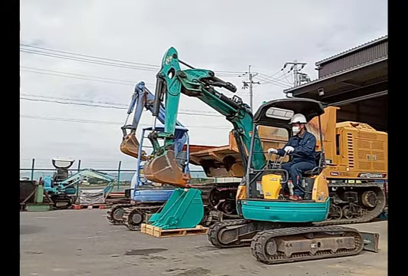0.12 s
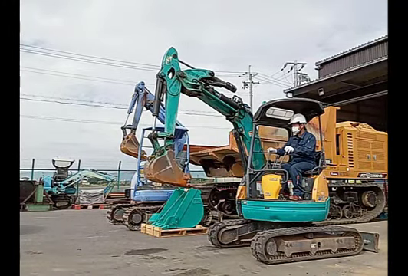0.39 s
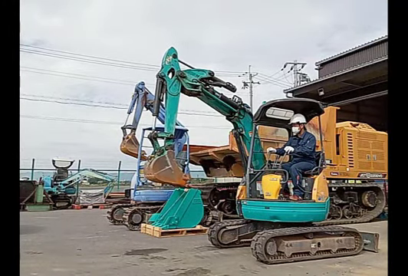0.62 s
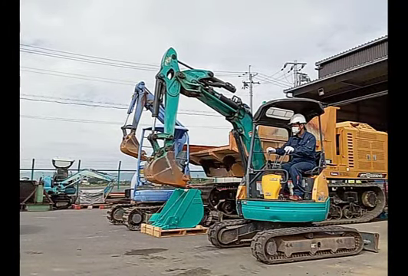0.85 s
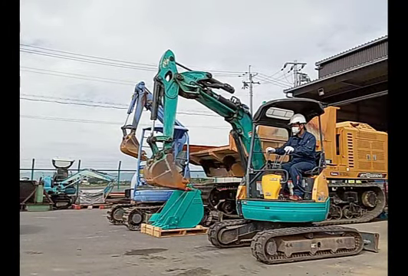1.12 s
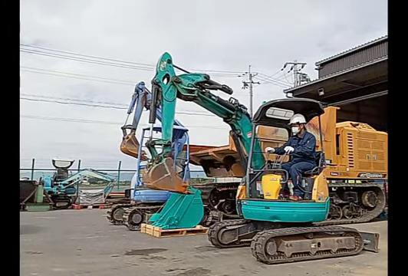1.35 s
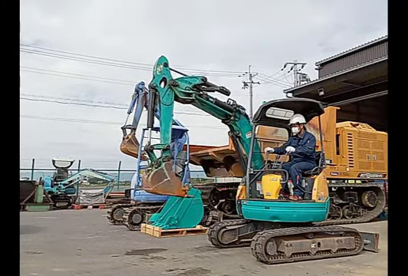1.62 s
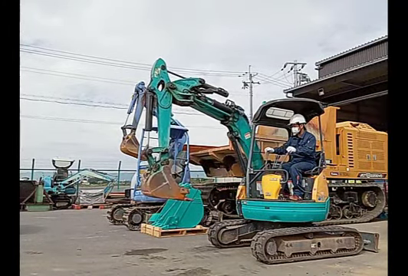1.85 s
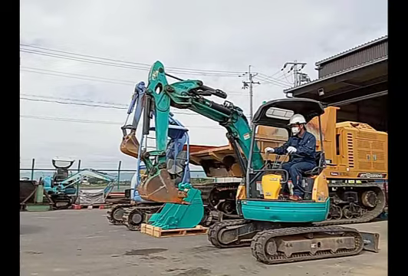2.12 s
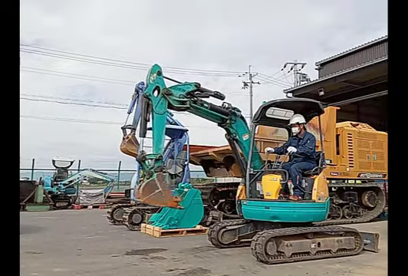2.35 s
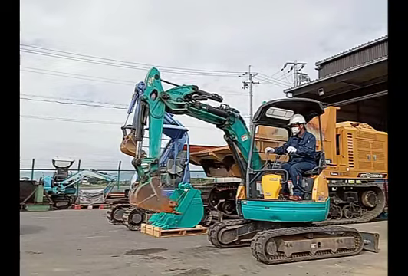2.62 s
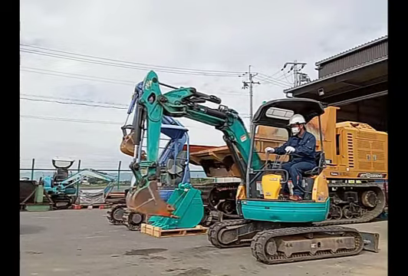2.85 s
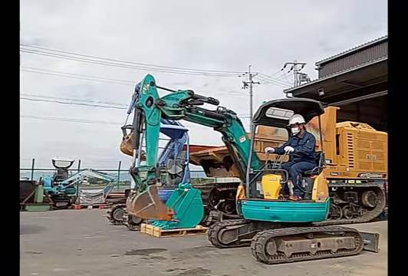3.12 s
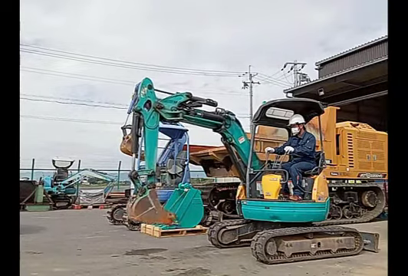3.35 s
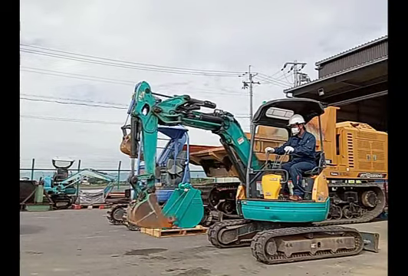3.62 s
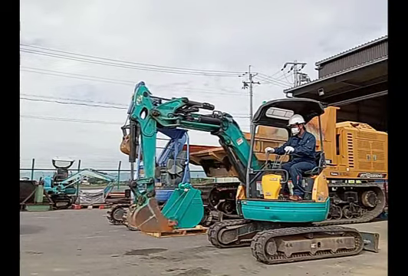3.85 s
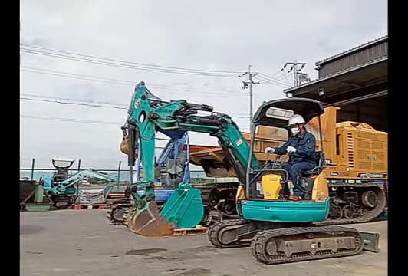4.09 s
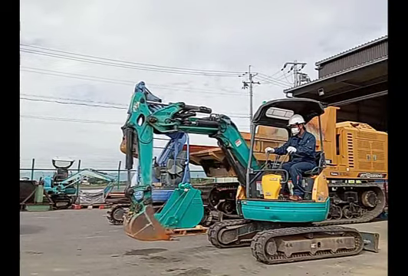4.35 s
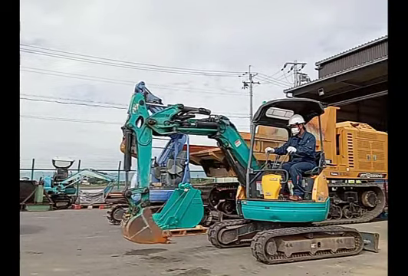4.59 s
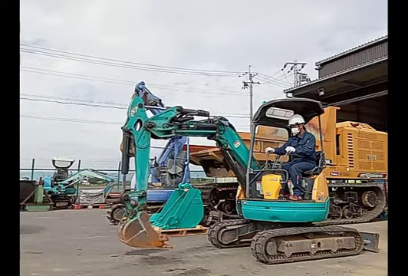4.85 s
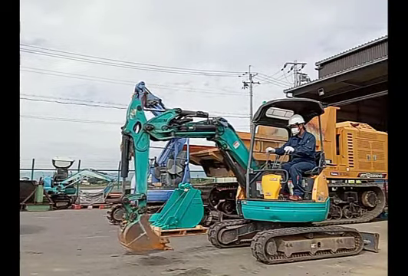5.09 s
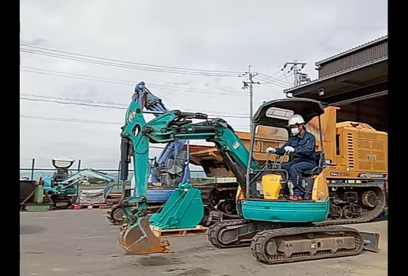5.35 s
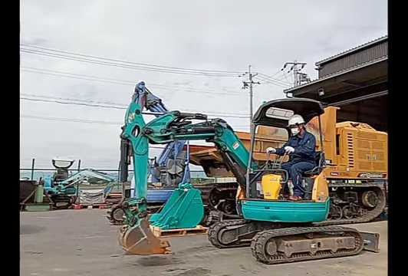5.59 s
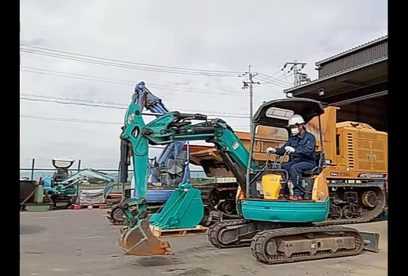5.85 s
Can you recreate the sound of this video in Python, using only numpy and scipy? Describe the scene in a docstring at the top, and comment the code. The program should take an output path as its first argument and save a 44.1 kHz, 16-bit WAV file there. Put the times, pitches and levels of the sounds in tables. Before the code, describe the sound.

A small diesel excavator runs close by from start to finish, already going at 0 s and still going when the sound cuts off near 6 s. Its speed is almost steady, about 1350 rpm, with slight hunting. The low exhaust hum sits around 135 Hz; a second engine further off hums near 127 Hz, so they beat in a quick throb, roughly eight pulses a second, and the camera's automatic gain pumps everything with it. Over this lie dry metallic knocks, grainy casing rattle and low fan and airflow rumble, with short diffuse yard echoes. At 0.34 s a steel pin gives one sharp, short double-edged click. From about 1.25 to 4.15 s hydraulic valves add a very faint, thin hiss around 10 kHz, softer outside that span. A much fainter tick comes at 4.8 s, and the near exhaust sinks slightly after 5.2 s. Stereo is moderately wide, with clatter more diffuse than bass.

```python
"""A yard: a small three-cylinder diesel excavator idles nearby and a second engine drones further off.
From the start their exhaust tones beat, and the camera's fast gain control pumps everything with that beat;
blows ring in the near engine over shaped noise, and the yard echoes. At 0.34 s a steel pin clicks.
From 1.25 to 4.15 s the hydraulics move the arm and high bands of noise hiss more strongly in the valves.
At 4.8 s the pin ticks faintly, and the near exhaust sinks at the end."""
import sys
import numpy as np
from scipy import signal
from scipy.fft import rfft, irfft, next_fast_len
from scipy.io import wavfile
from scipy.ndimage import uniform_filter1d, map_coordinates

SR = 44100
rng = np.random.default_rng(int(sys.argv[2]) if len(sys.argv) > 2 else 0)


def wav_out(sig):
    """Save sig, one row per channel (or a flat mono array), as 16-bit PCM at SR to the path in sys.argv[1]."""
    wavfile.write(sys.argv[1], SR, np.round(np.clip(np.atleast_2d(sig).T, -1, 1) * 32767).astype(np.int16))


def gain_from_db(level_db):
    """Convert decibel levels to linear amplitude factors (20 dB per decade)."""
    decades = np.asarray(level_db, float) / 20
    return 10 ** decades


N = 263277

# All levels are those ahead of the microphones and the gain control.
# near engine speed as the governor hunts: (time [s], speed [rpm])
ENGINE_SPEED = [(0, 1337.3), (.57, 1379.5), (.82, 1341.6), (1.35, 1367.2), (2.46, 1352.1), (3.22, 1364),
                (3.99, 1362.1), (4.62, 1352.3), (5.26, 1362.2), (5.76, 1338.6), (5.97, 1358.3)]
# near exhaust tones, before the slow level curve: (multiple of the two-turn cycle, level [dB rms])
NEAR_EXHAUST = [(3, -63), (6, -44.5), (9, -38), (10, -51), (12, -29.5), (15, -42), (20, -46), (27, -52),
                (30, -51), (36, -50), (45, -50), (56, -57)]
# slow level curve of the near exhaust: (time [s], level [dB])
NEAR_EXHAUST_LEVEL = [(0, -2.5), (.8, -1.5), (3, -1), (5.2, -2), (5.97, -5)]
# far four-cylinder exhaust tones: (multiple of the two-turn cycle, level [dB rms])
FAR_TONES = [(2, -66), (4, -53.5), (6, -54), (8, -35), (9, -47.5), (14, -47.5), (15, -50), (16, -50.5),
             (18, -59)]
# blows in every near-engine cycle: (crank angle [degrees], relative level [dB], favoured pitch [Hz])
ENGINE_BLOWS = [(85, -46, 230), (160, -43, 2300), (185, -37, 930), (222, -42, 2350), (240, -41, 750),
                (255, -47, 450), (300, -45, 950), (405, -46, 2200), (415, -47, 450), (430, -40, 1450),
                (520, -48, 3100), (535, -39, 1200), (550, -37, 410), (640, -37, 1950), (650, -42, 430),
                (690, -33, 530), (694, -34, 1030)]
# ringing modes of engine block and bonnet: (frequency [Hz], relative level [dB], decay by 60 dB [s])
BLOCK_MODES = [(228, 0, .04), (330, -3, .025), (409, 0, .03), (510, 0, .035), (636, -3, .05),
               (737, -5, .04), (894, 0, .06), (940, -3, .05), (1021, 0, .05), (1165, -6, .04),
               (1380, -2, .04), (1940, 2, .032), (2180, -1, .03), (2390, 4, .045), (2520, 3, .04),
               (3100, -3, .025), (5240, -4, .02)]
# spectrum of the low airflow, fan and casing noise: (frequency [Hz], relative density [dB per Hz])
RUMBLE_SPECTRUM = [(15, -50), (30, -12.5), (55, -7), (80, -2), (130, 5), (200, 3.5), (280, -0.5), (460, -5),
                   (550, -2.5), (700, -12.5), (1200, -38.5)]
# spectrum of the casing noise that follows the firing: (frequency [Hz], relative density [dB per Hz])
RATTLE_SPECTRUM = [(400, -37), (750, -3), (1040, -5.5), (1520, -9.5), (2000, -7.5), (2460, -8),
                   (3420, -9.5), (4300, -13), (5130, -11), (6000, -19), (6450, -20.5), (6600, -18.5),
                   (6750, -23.5), (7700, -30), (9100, -37), (10500, -45), (11500, -65)]
# likeness of the noise at the left and right microphones: (frequency [Hz], likeness [0 to 1])
STEREO_LIKENESS = [(30, .93), (60, .72), (130, .94), (260, .94), (540, .92), (1100, .72), (2400, .44),
                   (5000, .4), (9000, .35)]
# strokes on the steel pin: (time [s], relative level [dB], favoured pitch [Hz])
PIN_STROKES = [(.342, -21.5, 2900), (.3484, -27, 1750), (4.826, -31, 2900)]
# ringing modes of the pin: (frequency [Hz], relative level [dB], decay by 60 dB [s])
PIN_MODES = [(1631, 0, .05), (2200, -7, .03), (2885, 1, .05), (4753, -6, .03)]
# valve noise bands: (opens [s], shuts [s], open level [dB rms], centre [Hz], width [Hz])
VALVE_BANDS = [(1.25, 4.15, -68, 9900, 650), (1.25, 4.1, -75, 9770, 70), (1.7, 2.75, -75, 10300, 110)]
# balance of the two microphones: (frequency [Hz], left minus right [dB])
MICROPHONE_BALANCE = [(60, -.3), (250, -.6), (600, -.4), (1500, -1.1), (3000, -1.4), (5500, 1.1),
                      (8000, -1.8), (10300, -1.6)]


def along(points, hz):
    """Reads (Hz, value) points on a log frequency axis."""
    f, v = np.transpose(points)
    return np.interp(np.log(hz + 1), np.log(f + 1), v)


def curves(rows):
    """One value per sample for each column after the time."""
    s, *cols = np.transpose(rows)
    return [np.interp(np.arange(N) / SR, s, c) for c in cols]


def unit(x):
    """Scales to rms 1."""
    return x / np.sqrt(np.mean(x ** 2) + 1e-20)


def wobble(rate):
    """A smooth random curve with the given number of knots a second."""
    knots = rng.standard_normal(int(N * rate / SR) + 4)
    return map_coordinates(knots, [np.arange(N) * rate / SR])


def filtered(x, response):
    """Multiplies the spectrum of x by a complex response of frequency."""
    m = next_fast_len(N + SR // 2)
    return irfft(rfft(x, m) * response(np.fft.rfftfreq(m, 1 / SR)), m)[..., :N]


def rush(spectrum, patchy_db):
    """Stereo noise of rms 1, with random patches of gain in time and frequency."""
    z = signal.stft(rng.standard_normal((2, N)), nperseg=512)[2]
    field = uniform_filter1d(rng.standard_normal(z.shape[1:]), size=5, axis=0)
    field = uniform_filter1d(field, size=6, axis=1)
    pair = signal.istft(z * gain_from_db(patchy_db * unit(field)), nperseg=512)[1][:, :N]

    def mid_side_response(hz):
        # the less alike the microphones, the more energy goes to their difference
        angle = np.arccos(np.clip(along(STEREO_LIKENESS, hz), -1, 1)) / 2
        return gain_from_db(along(spectrum, hz)) * [np.cos(angle), np.sin(angle)]

    mid, side = filtered(pair, mid_side_response)
    return unit(np.array([mid + side, mid - side]))


def ring(blows, hz, t60):
    """A damped sine after every blow."""
    pole, turn = gain_from_db(-60 / (t60 * SR)), 2 * np.pi * hz / SR
    return signal.lfilter([0, pole * np.sin(turn)], [1, -2 * pole * np.cos(turn), pole ** 2], blows)


def struck(times, db, centre_hz, modes, narrow_db, scatter_db):
    """Blows excite modes less the further they lie from the favoured pitch; each answer varies randomly."""
    at = np.clip(np.round(times * SR).astype(int), 0, N - 1)
    luck = rng.standard_normal((len(at), len(modes)))
    out = np.zeros(N)
    for k, (hz, mode_db, t60) in enumerate(modes):
        octaves_off = np.log2(hz / centre_hz)
        size = gain_from_db(db + mode_db - narrow_db * octaves_off ** 2 + scatter_db * luck[:, k])
        blows = np.bincount(at, size, N)
        out += ring(blows, hz, t60) - ring(blows, hz, t60 / 4)  # swells briefly before it fades
    return out


def note(cycles, orders, waver_db):
    """Exhaust tones at multiples of the engine cycle, each wavering slightly in level."""
    out = np.zeros(N)
    for k, db in orders:
        level = np.sqrt(2) * gain_from_db(db + waver_db * wobble(5))
        out += level * np.cos(2 * np.pi * k * cycles)
    return out


def crank():
    """Engine cycles since the start: speed summed over time, one cycle being two turns or 720 degrees."""
    rpm, = curves(ENGINE_SPEED)
    return np.cumsum(rpm) / (120 * SR) - 14.7 / 720  # starts at -14.7 degrees


def since_puff(cycles):
    """Cycles counted from the first exhaust puff, at 161.5 crank degrees."""
    return cycles - 161.5 / 720


def silencer(x):
    """The silencer's resonance turns the phase of tones, by up to half a turn above it, not their level."""
    centre, width = 163, 20  # Hz
    return filtered(x, lambda hz: np.exp(-1j * np.arctan2(hz * width, centre ** 2 - hz ** 2)))


def near_exhaust(cycles):
    """The excavator's exhaust: tones locked to its crank, through the silencer."""
    level_db, = curves(NEAR_EXHAUST_LEVEL)
    return gain_from_db(level_db) * silencer(note(since_puff(cycles), NEAR_EXHAUST, waver_db=1.1))


def far_exhaust():
    """The four-cylinder engine further off: exhaust tones at one steady speed."""
    rpm, start_deg = 1909.8, 58
    cycles = rpm / 120 * np.arange(N) / SR + start_deg / 720
    return note(cycles, FAR_TONES, waver_db=1.3)


def knocks(cycles, clatter_db):
    """Blows return each cycle, a little early or late, and ring the block and bonnet."""
    deg, db, centre_hz = np.transpose(ENGINE_BLOWS)
    due = np.arange(-1, int(cycles[-1]) + 1)[:, None] + deg / 720
    jitter = .00012 * rng.standard_normal(due.shape)  # s
    times = np.interp(due, cycles, np.arange(N) / SR) + jitter
    inside = (due > cycles[0]) & (due < cycles[-1])
    which = np.nonzero(inside)[1]
    blows = struck(times[inside], db[which], centre_hz[which], BLOCK_MODES, narrow_db=40, scatter_db=3)
    return gain_from_db(clatter_db) * blows


def rumble():
    """Low airflow, fan and casing noise: shaped noise whose level wanders slightly."""
    return gain_from_db(-36.5 + 0.27 * wobble(3.9)) * rush(RUMBLE_SPECTRUM, patchy_db=1.16)


def rattle(cycles, clatter_db):
    """Casing noise that jumps at each of three firings a cycle and sags before the next."""
    since = (3 * since_puff(cycles)) % 1
    gate = uniform_filter1d(gain_from_db(-3 * since ** 3), size=120)
    level_db = -40.5 + clatter_db + 0.23 * wobble(5.13)
    return gain_from_db(level_db) * unit(gate * rush(RATTLE_SPECTRUM, patchy_db=1.5))


def yard(x):
    """Ground, shed and parked machines answer after 7 ms, differently at each side; the bass dies first."""
    hz, t, z = signal.stft(rng.standard_normal((2, SR // 2)), SR, nperseg=256)
    t60 = along([(200, 0.15), (4000, 0.25)], hz)[:, None]  # s
    colour = gain_from_db(along([(150, -19), (1500, -2.5)], hz))[:, None]
    tail = signal.istft(z * gain_from_db(-60 * t / t60) * colour, SR, nperseg=256)[1]
    tail = tail / np.linalg.norm(tail[0])
    delayed = np.pad(x, (300, 0))[None]
    return signal.fftconvolve(delayed, tail, axes=1)[:, :N]


def steel_pin():
    """Strokes on a steel pin ring its modes."""
    return struck(*np.transpose(PIN_STROKES), PIN_MODES, narrow_db=22, scatter_db=.6)


def valve():
    """Oil hisses and whistles through the spool valves: narrow fluttering noise, leaking softly while shut."""
    move_s, leak_db, flutter_db = .2, -12, 2  # time to open or shut; shut level under open; unsteadiness
    t, out = np.arange(N) / SR, 0
    for opens, shuts, db, hz, width in VALVE_BANDS:
        band = [(hz - 4 * width, -50), (hz - width, -10), (hz, 0), (hz + width, -10), (hz + 4 * width, -50)]
        shut = np.clip(np.maximum(opens - t, t - shuts) / move_s + .5, 0, 1)
        level_db = db + leak_db * shut + flutter_db * wobble(13)
        out = out + gain_from_db(level_db) * rush(band, patchy_db=2.5)
    return out


def scene():
    """Both engines, the pin, the yard's echoes and the hydraulics."""
    cycles = crank()
    clatter_db = -1.56 + 0.05 * wobble(2.45)  # drifts slowly, shared by knocks and rattle
    blows = knocks(cycles, clatter_db)
    pin = steel_pin()
    echoes = gain_from_db(-8) * yard(blows + gain_from_db(-10) * pin)
    engines = near_exhaust(cycles) + far_exhaust() + blows + rumble() + rattle(cycles, clatter_db)
    return engines + echoes + pin + valve()


def top_cut(x):
    """Nothing passes above the cut-off."""
    return signal.sosfilt(signal.butter(12, 10860, fs=SR, output="sos"), x)


def record(dry):
    """Two spaced microphones, then the camera's fast gain control, which leans against the loudness."""
    side = np.array([[.5], [-.5]])
    lag = 6 / 44100  # s by which the left microphone hears late
    ports = filtered(dry, lambda hz: gain_from_db(side * along(MICROPHONE_BALANCE, hz))
                     * np.exp(-2j * np.pi * hz * lag * side))
    ports = filtered(ports, lambda hz: hz ** 2 / (hz ** 2 + 12 ** 2))  # capsules pass no steady pressure
    power = uniform_filter1d(np.mean(ports ** 2, axis=0), int(0.015 * SR))
    power = uniform_filter1d(power, int(0.012 * SR))
    # unity gain near -23 dB; the small constant limits the boost of quiet sound
    gain = (np.abs(power) / gain_from_db(-23.0) ** 2 + 0.00075) ** -.2
    mix = ports * gain
    return top_cut(mix)


dry = scene()
out = record(dry)
wav_out(out)
```